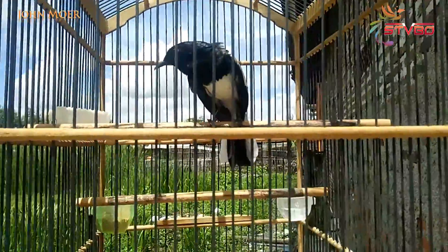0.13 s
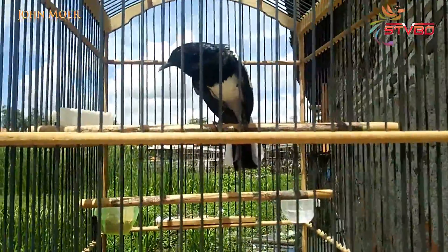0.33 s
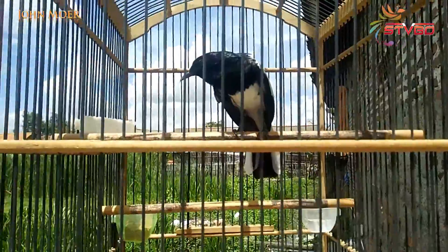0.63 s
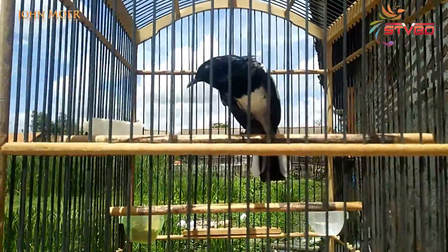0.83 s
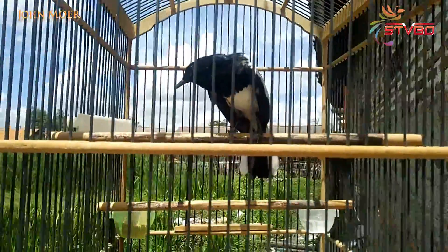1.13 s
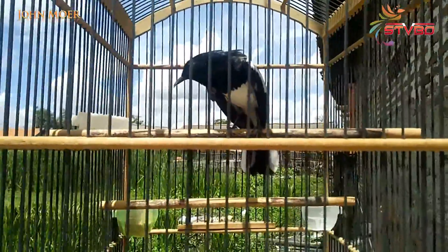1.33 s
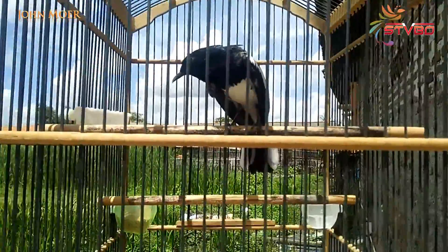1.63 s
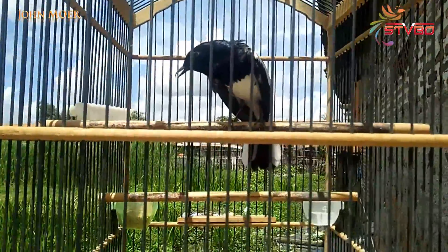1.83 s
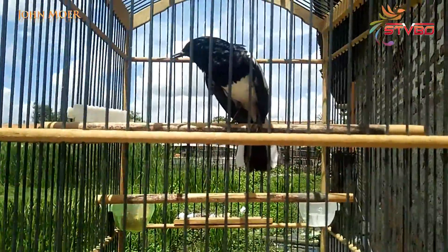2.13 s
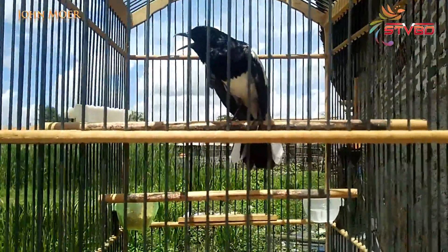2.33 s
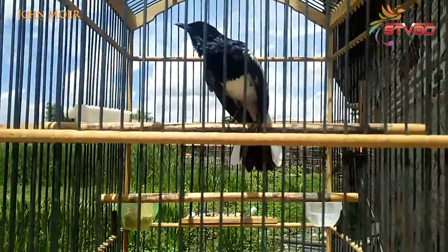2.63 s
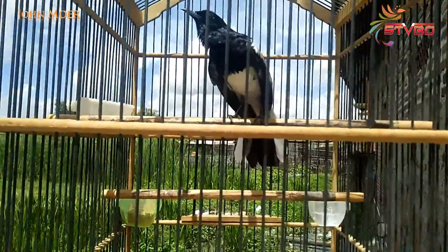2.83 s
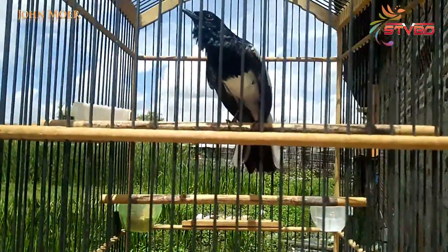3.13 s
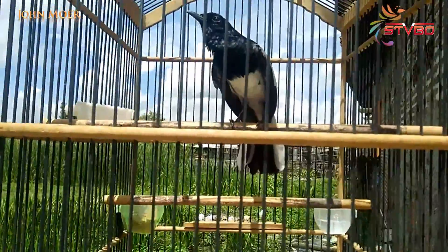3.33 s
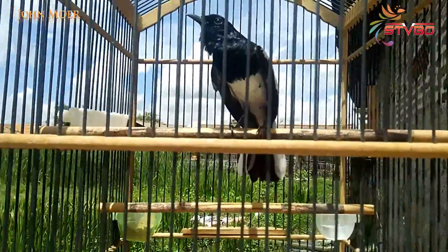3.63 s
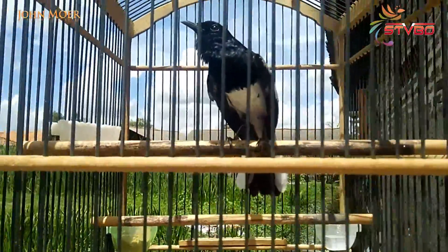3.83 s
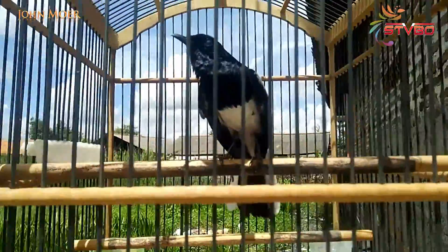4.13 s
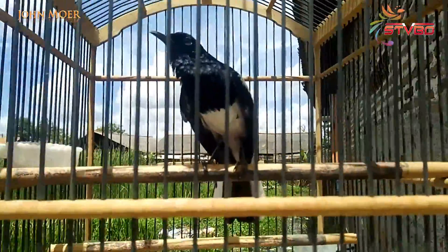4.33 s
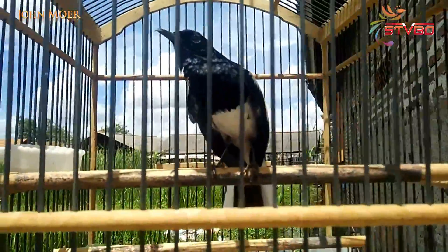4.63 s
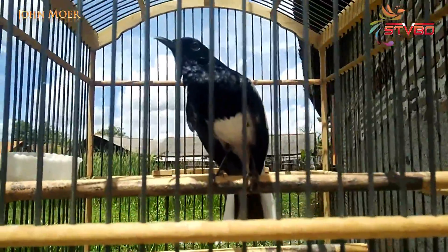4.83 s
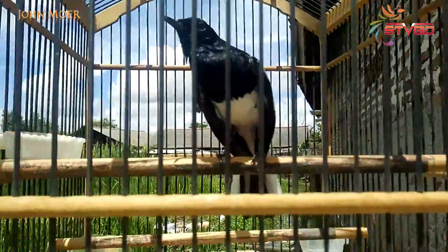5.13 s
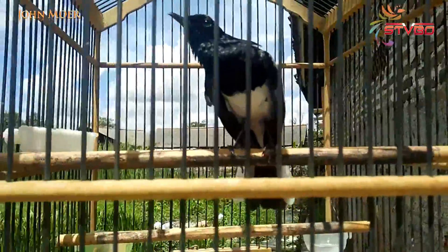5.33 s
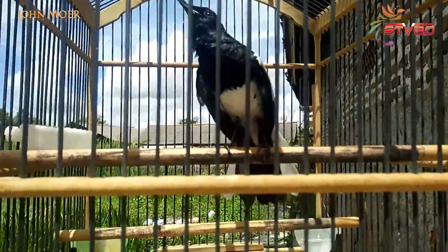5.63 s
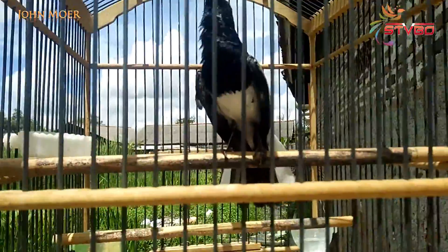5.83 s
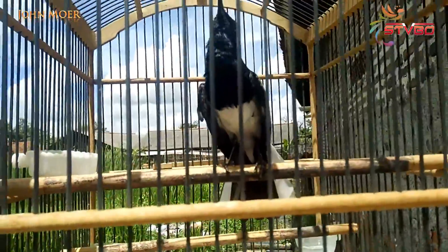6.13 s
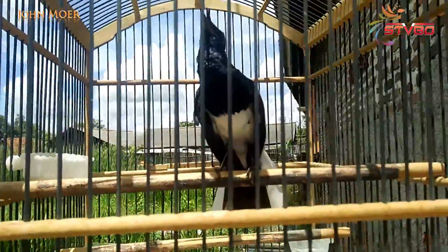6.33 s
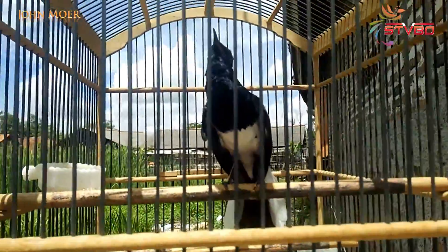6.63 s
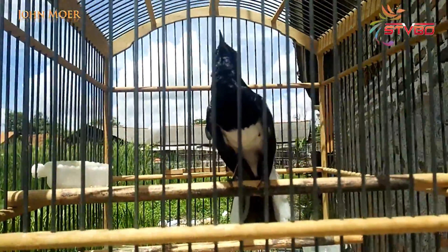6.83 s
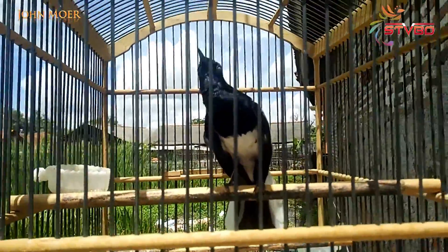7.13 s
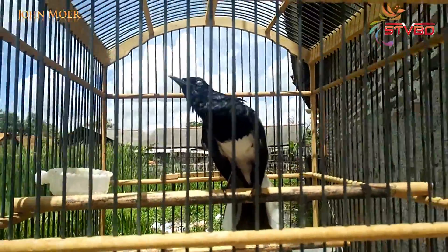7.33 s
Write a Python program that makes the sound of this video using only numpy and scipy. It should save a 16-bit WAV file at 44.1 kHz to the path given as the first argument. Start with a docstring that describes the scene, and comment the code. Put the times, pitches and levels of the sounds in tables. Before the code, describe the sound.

Close phone capture of a caged songbird in an open yard. Wind thumps and tiny chirps come first, with a very faint wavering whistle behind. The bird sings a piercing rapid warble, pauses, then whistles plain notes and a short trill while roosters crow far away. After more wind buffeting come abrupt falling chirps and another shrill, rising warble. Leaf hiss swells slightly with louder sounds.

```python
"""Wind hisses in the leaves and thumps on a phone's microphone while small birds chirp in a yard.
A thin far whistle wavers, then a caged songbird close by gives a loud warble, two tones swinging and mixing.
Two roosters, pulses shaped by a throat, crow far off as the songbird adds plain notes and a quick climbing trill.
Its falling chirps and a second loud warble follow, and the small birds chirp again.
Throughout, the phone's suppressor lets more of the yard's hiss through when something louder sounds."""
import sys
import numpy as np
from scipy import signal
from scipy.fft import rfft, irfft, next_fast_len
from scipy.io import wavfile
from scipy.ndimage import uniform_filter1d, map_coordinates

SR = 44100
rng = np.random.default_rng(int(sys.argv[2]) if len(sys.argv) > 2 else 0)


def gain_from_db(level_db):
    """Convert decibel levels to linear amplitude factors (20 dB per decade)."""
    decades = np.asarray(level_db, float) / 20
    return 10 ** decades


def output_pcm(signal):
    """Save a mono or channel-first signal as 16-bit PCM at the path in sys.argv[1].

    Samples are clipped to [-1, 1] before scaling.
    """
    pcm = np.clip(np.atleast_2d(signal).T, -1, 1) * 32767
    wavfile.write(sys.argv[1], SR, np.round(pcm).astype(np.int16))


N = 329427  # length in samples

# how strongly the songbird's beak lets each pitch out: (frequency [Hz], gain [dB])
BEAK_GAIN = [(700, -16), (1500, -5.5), (3500, -1), (4200, -0.5), (5600, 8), (6600, -3.5), (7700, -0.5),
             (9300, 0), (10300, -13), (12000, -0.5), (13500, -12.5), (15000, -28)]


def unit(x):
    """Scales a sound to rms 1."""
    return x / np.sqrt(np.mean(x ** 2) + 1e-20)


def along(points, hz):
    """Reads a curve of (frequency [Hz], value) points on a log frequency axis."""
    f, v = np.transpose(points)
    return np.interp(np.log(hz + 1), np.log(f + 1), v)


def span(rows):
    """Gives a table's first sample, and one value per sample for each column after the time."""
    s, *cols = np.transpose(rows)
    at = np.arange(round(s[0] * SR), min(round(s[-1] * SR), N))
    return at[0], [np.interp(at / SR, s, c) for c in cols]


def wobble(n, rate):
    """A smooth random curve of n samples through rate random points a second."""
    knots = rng.standard_normal(int(n * rate / SR) + 4)
    return map_coordinates(knots, [np.arange(n) * rate / SR])


def filtered(x, gain):
    """Multiplies the spectrum by a gain per frequency."""
    m = next_fast_len(N + 8192)
    return irfft(rfft(x, m) * gain(np.fft.rfftfreq(m, 1 / SR)), m)[..., :N]


def turns(hz):
    """Adds a pitch curve up to a running phase, and gives short fades (1.5 ms) for its two ends."""
    k = np.arange(len(hz))
    phase = 2 * np.pi * np.cumsum(hz) / SR
    return phase, np.minimum(1, np.minimum(k, k[::-1]) / (0.0015 * SR))


def echoes(x, t60):
    """Blurred echoes: noise tails of energy 1 that fade 60 dB in t60 seconds, redrawn every quarter second."""
    t, hop = np.arange(SR // 2) / SR, SR // 4
    out = np.zeros(N + 2 * SR)
    for i in range(0, N, hop):
        tail = rng.standard_normal(len(t)) * gain_from_db(-60 * t / t60)
        wet = signal.fftconvolve(x[i:i + hop], tail / np.linalg.norm(tail))
        out[i:i + len(wet)] += wet
    return out[:N]


def leaves():
    """The patchy hiss of leaves and a far chorus of birds: noise with a shaped spectrum."""
    # colour of the hiss: (frequency [Hz], relative level per Hz [dB])
    yard_colour = [(290, -39.5), (500, -7.5), (561, -8), (696, -9), (1220, -12), (1530, -10.5),
                   (2430, -15.5), (4910, 0), (7340, -22), (13800, -32.5), (15500, -48)]
    hiss = unit(filtered(rng.standard_normal(N), lambda hz: gain_from_db(along(yard_colour, hz))))
    return gain_from_db(-52 + 0.83 * wobble(N, 34)) * hiss


def wind():
    """Lumpy low noise swells in gusts, each with a sharp slap of short low tones on the microphone port."""
    # rumble between gusts, before its random swelling: (time [s], level [dB])
    breeze = [(0.0, -30), (0.19, -37.5), (0.31, -30.5), (0.48, -72), (1.14, -55.5), (1.41, -38.5),
              (1.58, -59.5), (2.29, -78), (2.56, -51.5), (3.7, -42.5), (4.87, -63.5), (5.06, -49),
              (6.2, -58.5), (6.49, -41), (6.87, -73), (7.47, -59)]
    # gusts on the port: (time [s], hold [s], rumble level [dB], slap strength [dB])
    gusts = [(0.009, 0.052, -32, -33), (.129, 0.01, -22, -21), (0.189, 0.007, -17.5, -24),
             (0.234, 0.01, -14, -20), (.361, 0.0082, -27, -19.5), (0.448, 0.019, -43, -64),
             (0.687, 0.03, -41, -55), (.719, .01, -56, -34), (0.758, .015, -38, -30),
             (1.056, 0.018, -54.5, -70), (1.295, 0.022, -27.5, -24), (1.415, 0.06, -25, -54),
             (1.507, 0.039, -33, -18.5), (1.737, 0.028, -55, -67), (1.887, .02, -54, -64),
             (2.41, 0.062, -37.5, -32.5), (2.881, 0.055, -26.5, -56), (2.974, 0.037, -36, -60),
             (3.257, 0.06, -21, -17.5), (3.546, 0.053, -27, -30.5), (3.776, 0.005, -16.5, -24.5),
             (3.834, 0.0075, -25.5, -17), (4.262, 0.036, -38, -58), (4.558, 0.028, -50.5, -65),
             (4.954, 0.063, -16.5, -7.5), (5.098, 0.011, -29, -55), (5.174, 0.028, -31.5, -31),
             (5.414, 0.028, -31.5, -31.5), (5.546, .02, -39, -60), (5.672, 0.048, -36, -49.5),
             (5.734, 0.035, -39, -22), (5.925, 0.0065, -36, -20), (5.961, 0.0077, -38, -36),
             (6.03, 0.007, -42.5, -62), (6.318, 0.027, -33, -38), (7.22, 0.012, -36, -68)]
    # colour of the rumble: (frequency [Hz], relative level per Hz [dB])
    rumble_colour = [(21, -30), (36, 4.5), (65, 8), (86, 6), (283, -22), (458, -33), (508, -39.5),
                     (800, -48), (1040, -71.5), (1760, -120)]
    rise, fall = 904, 601  # how fast a gust swells and dies [dB/s]
    crackle_hz, crackle_growth = 340, 1.751  # band centre [Hz], dB of crackle per dB of rumble

    s, db = np.transpose(breeze)
    now = np.arange(N) / SR
    db = np.interp(now, s, db) + 5 * wobble(N, 20)
    for s, hold, gust_db, _ in gusts:
        before, after = np.maximum(s - now, 0), np.maximum(now - s - hold, 0)
        db = np.maximum(db, gust_db - rise * before - fall * after)

    rumble = unit(filtered(rng.standard_normal(N), lambda hz: gain_from_db(along(rumble_colour, hz))))
    lumpy = unit(gain_from_db(1.4 * wobble(N, 28)) * rumble)
    out = np.pad(gain_from_db(db) * lumpy, (0, SR))

    # harder wind is brighter: the crackle grows faster than the rumble
    crackle = unit(filtered(rng.standard_normal(N),
                            lambda hz: np.exp(-np.log(hz / crackle_hz + 1e-9) ** 2 / 0.32)))
    out[:N] += gain_from_db(-16 + crackle_growth * db + 4.4 * wobble(N, 90)) * crackle

    t = np.arange(SR // 10) / SR
    slap = np.sin(2 * np.pi * 210 * t) * gain_from_db(-60 * t / 0.02)
    push = gain_from_db(-16) * np.sin(2 * np.pi * 85 * t) * gain_from_db(-60 * t / 0.008)  # bass under the slap
    onset = 1 - np.exp(-t / 0.0011)
    for (s, _, _, slap_db), sign in zip(gusts, rng.choice([-1, 1], len(gusts))):
        out[round(s * SR):][:len(t)] += sign * gain_from_db(slap_db) * onset * (slap + push)
    return out[:N]


def small_birds():
    """Gliding sines, shaken in pitch and soaked in echoes, make the chirps of other birds."""
    # calls around the yard, the lowest a dove:
    # (time [s], length [s], first pitch [Hz], last pitch [Hz], relative level [dB])
    chirps = [(.0, 0.024, 4630, 4300, -80), (.07, 0.06, 5940, 6380, -58.5), (0.062, 0.061, 2960, 3180, -56),
              (0.089, 0.042, 5140, 4800, -37.5), (0.089, 0.037, 2710, 2400, -60),
              (0.138, 0.035, 5000, 4800, -63), (0.121, .05, 6720, 7000, -62),
              (0.182, 0.044, 5230, 4800, -47.5), (0.196, 0.019, 3700, 3650, -49),
              (0.214, 0.03, 2195, 2150, -62), (0.226, 0.034, 4350, 5000, -46.5),
              (0.241, 0.03, 6300, 6370, -54.5), (0.31, 0.042, 4560, 4440, -60.5),
              (1.69, .125, 4910, 3450, -78), (1.738, .05, 5350, 5250, -71), (2.757, 0.074, 3230, 3120, -74),
              (4.298, .06, 5200, 4820, -48.5), (4.708, 0.41, 1165, 1116, -79),
              (4.75, .16, 4650, 3200, -77.5), (4.869, 0.039, 6460, 5800, -48),
              (4.902, 0.023, 5140, 5000, -44), (4.945, 0.027, 5595, 5100, -48),
              (4.953, 0.033, 5660, 6400, -50), (4.994, 0.027, 5320, 5100, -48),
              (5.08, .2, 313.5, 356, -69.5), (5.291, .25, 345, 395, -72), (5.2, 0.17, 4950, 3240, -77.5),
              (5.87, 0.11, 4005, 3500, -76.5), (5.948, 0.05, 5180, 4850, -79),
              (6.965, .012, 3800, 2600, -68.5), (7.157, 0.021, 6100, 5000, -47),
              (7.244, 0.022, 5905, 5000, -55), (7.18, .2, 553, 519, -78), (7.335, 0.15, 3820, 3600, -72)]
    blur_cycles = 3.4  # pitch blur [Hz] times length [s]: short chirps are rough, long glides clean
    dry = np.zeros(N + SR)
    for s, length, first_hz, last_hz, db in chirps:
        u = np.linspace(0, 1, round(length * SR))
        blur_hz = blur_cycles / length * wobble(len(u), 280)
        phase = turns(first_hz + (last_hz - first_hz) * u + blur_hz)[0]
        swell = np.sin(np.pi * u ** 1.3) ** 0.85
        dry[round(s * SR):][:len(u)] += 2 * gain_from_db(db) * swell * np.sin(phase)
    return dry[:N] + gain_from_db(-1.5) * echoes(dry[:N], 0.21)


def whistler():
    """A thin far whistle: a sine that wavers in pitch and strength, with strong echoes."""
    # one list for each of three breaths: (time [s], pitch [Hz])
    breaths = [
        [(.66, 2300), (.69, 2490), (.86, 2560), (.885, 2200), (.97, 2100)],
        [(1.03, 1850), (1.25, 1620), (1.36, 1600)],
        [(1.43, 2100), (1.6, 2450), (1.72, 2420), (1.76, 2300), (2.05, 2360), (2.1, 2480), (2.2, 2320),
         (2.36, 2200)],
    ]
    # one for each breath: (relative level [dB])
    breath_db = (-60, -68, -62)
    dry = np.zeros(N)
    for rows, db in zip(breaths, breath_db):
        i, (hz,) = span(rows)
        phase, ends = turns(hz + 55 * wobble(len(hz), 70))
        strength = np.sqrt(2) * gain_from_db(db + 7 * wobble(len(hz), 30)) * ends
        dry[i:i + len(hz)] = strength * np.sin(phase)
    return dry + gain_from_db(3) * echoes(dry, .2)


def two_voices(hz, steady_hz, db, throb_db, bright_db):
    """Half of the syrinx swings and throbs, half holds a lower pitch; sums and differences sound too."""
    # tones made by the two: (multiple of swinging voice, multiple of steady voice, relative level [dB])
    mixing = [(1, 0, -1.5), (0, 1, -17), (1, -1, -21), (2, -1, -36.5), (1, 1, -24), (2, 0, -30.5),
              (3, 0, -46), (2, 1, -40), (1, 2, -40)]
    phase, ends = turns(hz + 12 * wobble(len(hz), 400))
    unsteady_hz = .12 * np.abs(hz.mean() - steady_hz) * wobble(len(hz), 300)
    steady = turns(steady_hz + unsteady_hz)[0]
    tones = np.zeros(len(hz))
    for a, b, level in mixing:
        throb_share = np.clip(a, .65, 1) + 1.5 * (a + b == 0)  # equal-and-opposite mixes throb most
        beak_db = along(BEAK_GAIN, np.abs(a * hz + b * steady_hz))
        tone_db = level + bright_db * (a + b > 1) + throb_share * throb_db + beak_db
        tones += gain_from_db(tone_db) * np.sin(a * phase + b * steady)
    # air rasps in wide swings
    air = np.convolve(rng.standard_normal(len(hz)), np.hanning(29), "same")
    tones += gain_from_db(-30 + .4 * throb_db) * (hz - steady_hz) / 1500 * air * np.sin(phase)
    return gain_from_db(db + 1.8 * wobble(len(hz), 300)) * ends * np.sqrt(2) * tones


def syrinx(hz, db):
    """A near sine with weak overtones; the beak sets how strongly each pitch comes out."""
    # (multiple of the pitch, relative level [dB])
    overtones = [(1, 5), (2, -16.5), (3, -26.5), (4, -51), (5, -40.5), (6, -42.5)]
    phase, ends = turns(hz + 12 * wobble(len(hz), 400))
    breath = gain_from_db(db + 1.2 * wobble(len(hz), 300)) * ends * np.sqrt(2)
    return breath * sum(gain_from_db(level + along(BEAK_GAIN, k * hz)) * np.sin(k * phase) for k, level in overtones)


def trill():
    """Note rows of a quickening trill: each note climbs, fades a little and starts with a flick from above."""
    start_s, start_hz, start_db, note_s = 3.919, 1957, -27, 0.018
    step_hz, step_db, flick_hz = 25.35, -.8, 90
    gap_s, lag_s = .026, .016  # spacing once up to speed; time lost while it speeds up
    notes = []
    for k in range(7):
        s = start_s + gap_s * k + lag_s * (1 - .5 ** k)
        hz = start_hz + step_hz * k
        notes.append((s, note_s, hz + flick_hz, hz, hz + step_hz, start_db + step_db * k))
    return notes


def songbird():
    """Warbles swing in pitch about 70-115 times a second, notes glide; near walls and the yard answer."""
    # one list per warble: (time [s], centre pitch [Hz], relative level [dB], swing about the centre [Hz])
    warbles = [
        [(2.372, 4900, -45.5, 950), (2.383, 5100, -33, 1050), (2.388, 5032, -12, 1150),
         (2.42, 5100, -11.5, 1000), (2.47, 4410, -8, 480), (2.54, 4183, -7.5, 80), (2.585, 4093, -7.5, 23),
         (2.611, 3708, -3, 30), (2.62, 3432, -23.5, 20)],
        [(6.304, 3557, -35, 120), (6.325, 3673, -17.5, 220), (6.39, 3910, -11, 294.1),
         (6.505, 4153, -10.5, 318.8), (6.53, 4400, -11, 525.8), (6.6, 4687, -11, 720), (6.668, 4950, -11, 739),
         (6.68, 4800, -38, 600)],
    ]
    # wider swings come slower, one row per warble:
    # (swing rate when narrow [1/s], slowing per kHz of swing [1/s])
    paces = [(96, 21), (120, 48)]
    # overtones of each warble, the beak gaping wider in the second: (added level [dB])
    gape_db = (-5, 4.5)
    # plain notes: (time [s], length [s], first, middle and last pitch [Hz], relative level [dB])
    plain_notes = [(3.372, 0.044, 1710, 1640, 1810, -33.5), (3.428, 0.068, 1872, 2032, 2024, -28),
                   (3.596, 0.039, 1910, 1786, 1950, -37), (3.66, 0.095, 1889, 1952, 2004, -24.5),
                   (3.803, 0.059, 1905, 1860, 2020, -30.5), (3.87, 0.061, 1870, 1934, 1910, -35.5),
                   (4.117, 0.046, 2137, 2150, 2130, -38.5), (4.252, 0.062, 2478, 2201, 1370, -25),
                   (5.668, .012, 5233, 4166, 3823, -34.5), (5.671, .022, 4178, 3680, 3560, -15.5),
                   (5.7, 0.0044, 5917, 5130, 4754, -27.5), (5.704, 0.014, 3793, 3282, 3186, -11.5),
                   (5.732, 0.023, 3105, 2598, 2486, -18.5), (5.754, 0.025, 2567, 2346, 2240, -31)]
    # echoes off the cage roof and house wall: (delay [s], level [dB])
    walls = [(.0012, -17), (.0031, -19), (.0062, -19), (.0094, -21), (.015, -22)]

    dry = np.zeros(N)
    for rows, (narrow, slower), bright_db in zip(warbles, paces, gape_db):
        i, (hz, db, swing_hz) = span(rows)
        swing_khz = swing_hz / 1000
        throb_depth = 18 * np.abs(swing_khz) ** 2.6  # [dB], steeply deeper in wide swings
        # no two swings quite alike
        cycle = turns(narrow - slower * swing_khz)[0] - 2.8 + 0.48 * wobble(len(hz), 70)
        pitch = hz + swing_hz * (np.cos(cycle) + 0.13 * np.cos(2 * cycle))  # peaks sharper than troughs
        # loudest after the top, later in wide swings
        throb_db = throb_depth * (np.cos(cycle - .4 - 0.61 * swing_khz ** 2) - 1) / 2
        # the steady voice nears the other as the swings narrow
        below = hz - np.maximum(1.6 * swing_hz - 400, 120)
        dry[i:i + len(hz)] = two_voices(pitch, below, db, throb_db, bright_db)

    for s, length, first_hz, middle_hz, last_hz, db in plain_notes + trill():
        u = np.linspace(0, 1, round(length * SR))
        # a parabola through the three pitches
        bow = 4 * u * (1 - u) * (middle_hz - (first_hz + last_hz) / 2)
        pitch = first_hz + (last_hz - first_hz) * u + bow
        drop = 1 - last_hz / first_hz
        lean = np.clip(.95 - 2.6 * drop, .42, 1.05)  # falling notes start abruptly
        roundness = np.clip(.7 + 2.5 * drop, .55, 1.3)  # level notes are flat-topped
        swell = np.sin(np.pi * u ** lean) ** roundness
        dry[round(s * SR):][:len(u)] += swell * syrinx(pitch, db)

    near = sum(gain_from_db(db) * np.pad(dry, (round(s * SR), 0))[:N] for s, db in walls)
    close = gain_from_db(-17) * echoes(dry, .12)
    return dry + near + close + gain_from_db(-31) * echoes(dry, .3)


def roosters():
    """Uneven pulses add lines between the overtones; rasp is noise gated by the pulses; a throat colours both."""
    # one list per syllable of two far roosters: (time [s], pitch [Hz], relative level [dB])
    syllables = [
        [(2.83, 724.6, -61.5), (2.97, 735, -54.5), (3.08, 751.5, -70)],
        [(3.115, 773.2, -49.5), (3.2, 810.5, -51.5), (3.75, 805.6, -51.5), (4.32, 788.8, -54.5),
         (4.46, 760, -63)],
        [(3.24, 768.2, -64), (3.6, 740, -62.5), (3.92, 662.7, -64), (4.44, 680, -70)],
        [(4.5, 745, -55), (4.65, 660, -67), (4.72, 642, -93)],
    ]
    # one per syllable: (cycles in each repeating group of uneven pulses)
    group_cycles = (2, 3, 2, 2)
    # unevenness of the pulses, one row per syllable: (at the start [0-1], at the end [0-1])
    unevenness = [(0.97, 0.68), (0, .9), (.05, .1), (0.32, 0.18)]
    # resonances of the throat: (frequency [Hz], gain [dB])
    throat = [(400, -27), (570, 1.5), (800, -2), (1100, 0.5), (1500, 13), (1900, -6.5), (2700, 1.5),
              (3500, -22), (5000, -11), (7000, -36.5)]
    rasp_share = .3
    dry = np.zeros(N)
    for rows, cycles, (first, last) in zip(syllables, group_cycles, unevenness):
        i, (hz, db) = span(rows)
        uneven = np.linspace(first, last, len(hz))
        phase, ends = turns(hz + 18 * wobble(len(hz), 60))
        pulses = np.exp(4 * (np.cos(phase) - 1)) * (1 + uneven * np.cos(phase / cycles))
        tone = unit(pulses - pulses.mean())
        rasp = unit(pulses * rng.standard_normal(len(hz)))
        voice = (1 - rasp_share) * tone + 2.7 * rasp_share * rasp
        dry[i:i + len(hz)] += gain_from_db(db + 5.1 * wobble(len(hz), 25)) * ends * voice
    dry = filtered(dry, lambda hz: gain_from_db(along(throat, hz)))
    return dry + gain_from_db(1.5) * echoes(dry, 0.36)


def opening_db(loud):
    """The suppressor opens with the smoothed level of the loud sounds and shuts in the lulls."""
    power = uniform_filter1d(loud ** 2, 900, origin=300)  # mostly the sound just past
    power = uniform_filter1d(power, 300)
    level_db = 10 * np.log10(np.abs(power) + 1e-9)
    return np.clip(level_db, -75, -26) + 24


def scene():
    """Faint sounds pass as the suppressor opens; left and right differ slightly, mostly in the treble."""
    # side (left-right difference) against mid (what both share): (frequency [Hz], gain [dB])
    width = [(300, -60), (3400, -50), (4000, -16), (8000, -13), (15000, -11)]
    crows = roosters()
    loud = songbird() + wind()
    open_db = opening_db(loud + crows)
    floor = gain_from_db(-81.5) * unit(filtered(rng.standard_normal(N), lambda hz: 1 / (1 + hz / 2000)))
    faint = gain_from_db(0.67 * open_db) * leaves()
    faint += gain_from_db(0.42 * open_db) * whistler()
    faint += gain_from_db(0.33 * (open_db + 8)) * crows
    mid = loud + faint + small_birds() + floor
    side = filtered(echoes(mid, .04), lambda hz: gain_from_db(along(width, hz)))
    return np.array([mid + side, mid - side])


def band_limit(x):
    """A steep low-pass at the top of the band."""
    return signal.sosfilt(signal.butter(12, 15750, fs=SR, output="sos"), x)


def record(dry):
    """Rounds off the loudest peaks, thins the deepest bass and top treble, and cuts at a band limit."""
    def band(hz):
        bass_cut = hz ** 2 / (hz ** 2 + 42 ** 2)
        treble_cut = 1 / (1 + (hz / 14000) ** 16)
        return (hz < 15750) * bass_cut * treble_cut

    rounded = dry / (1 + np.abs(dry / .92) ** 6) ** (1 / 6)
    mix = filtered(rounded, band)
    return band_limit(mix)


dry = scene()
out = record(dry)
output_pcm(out)
```